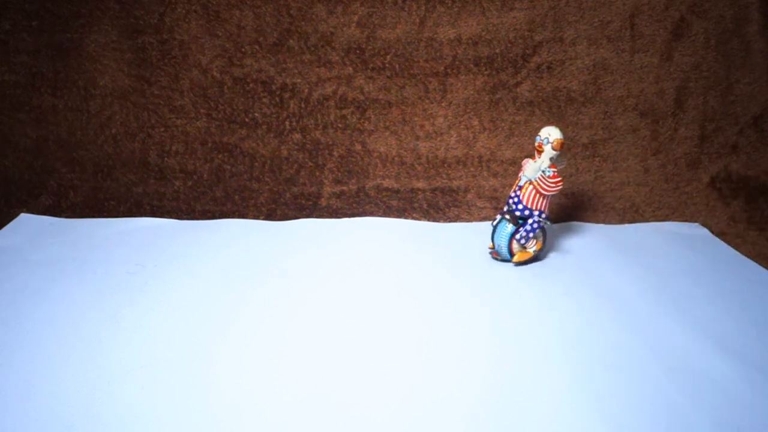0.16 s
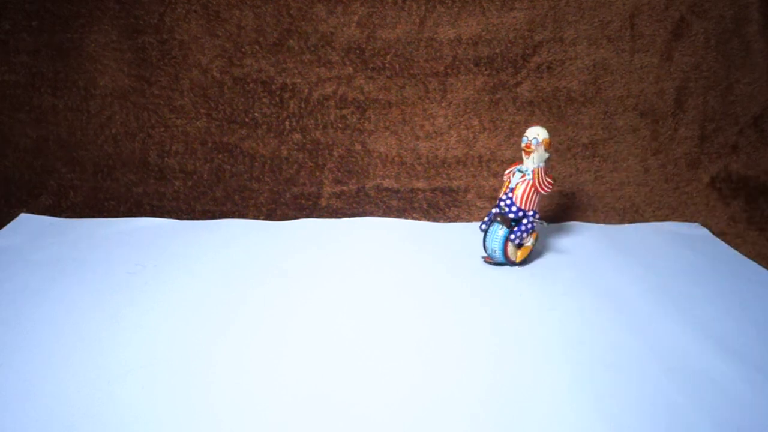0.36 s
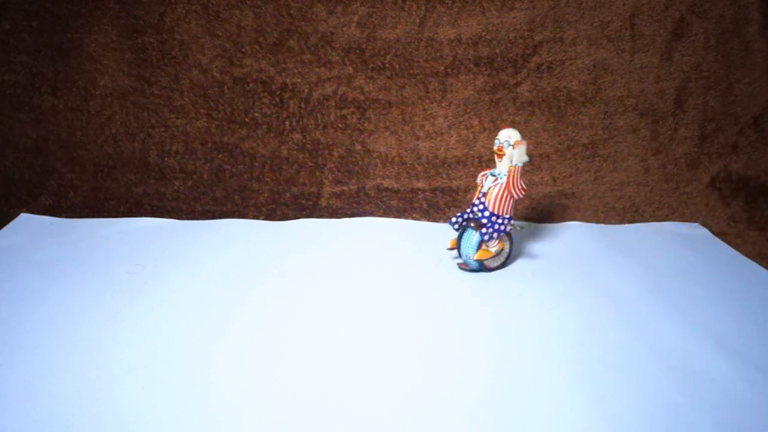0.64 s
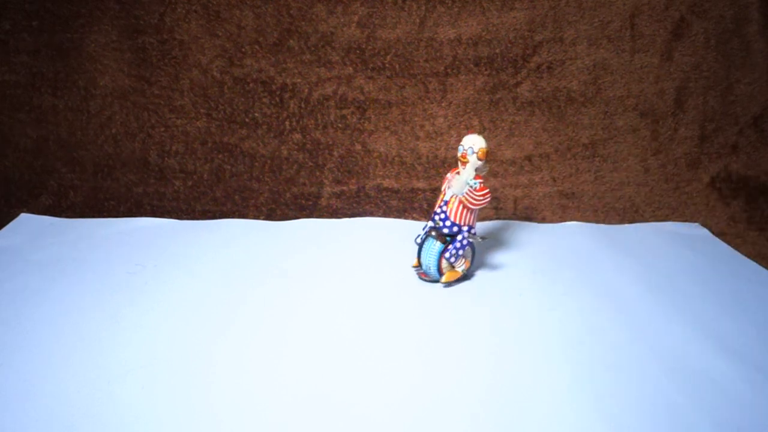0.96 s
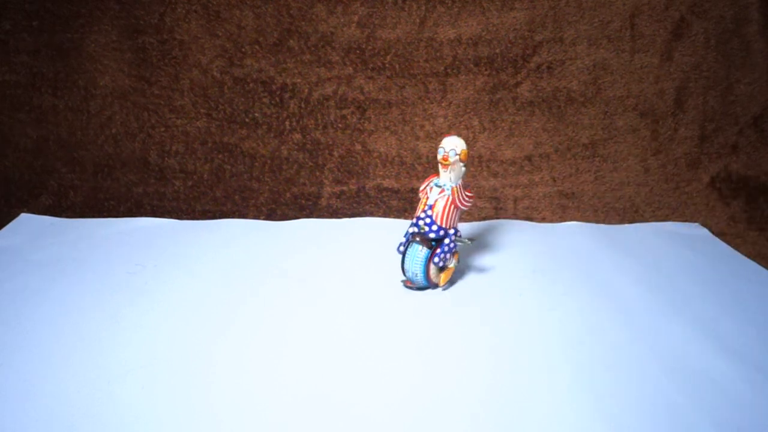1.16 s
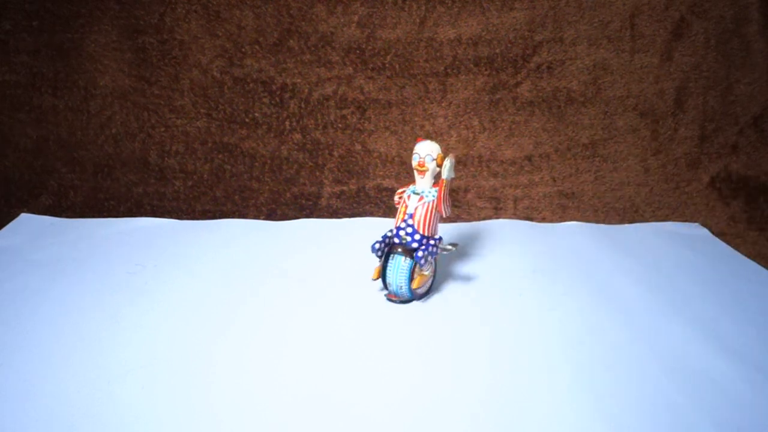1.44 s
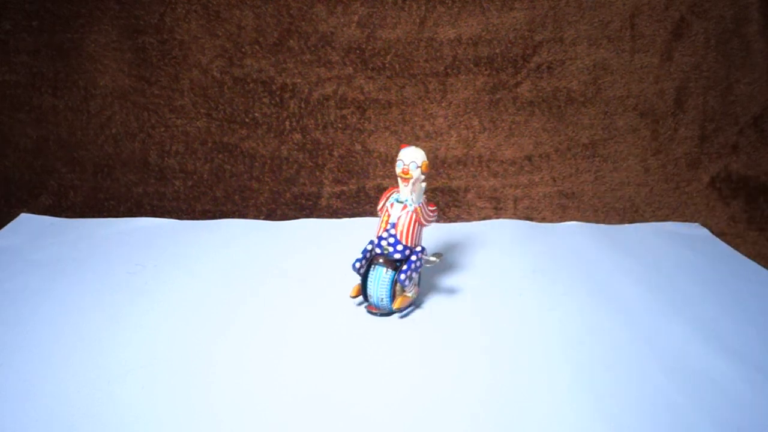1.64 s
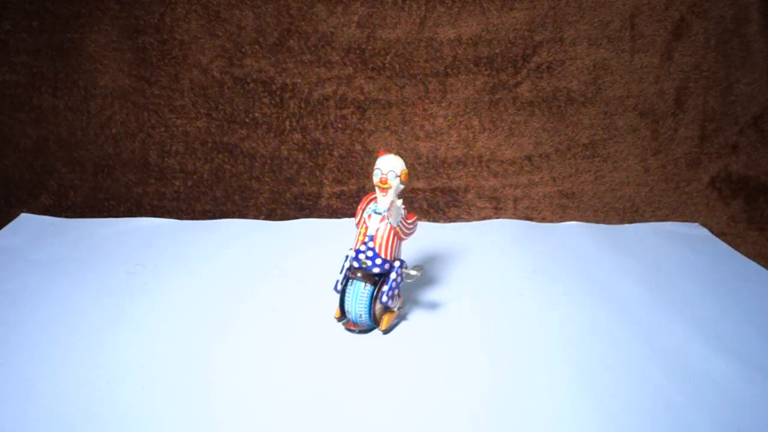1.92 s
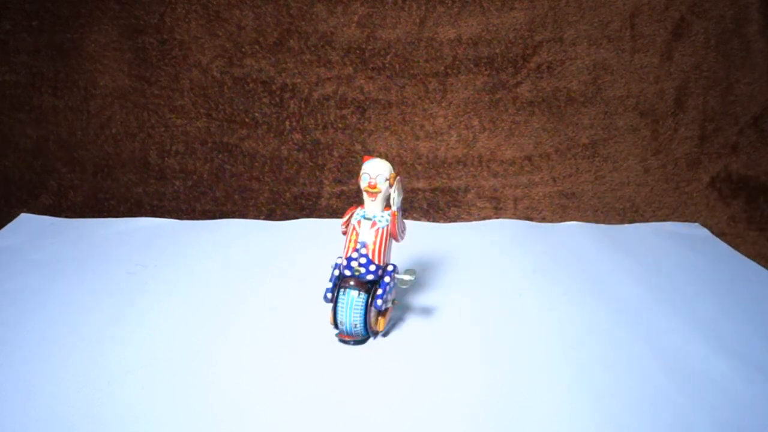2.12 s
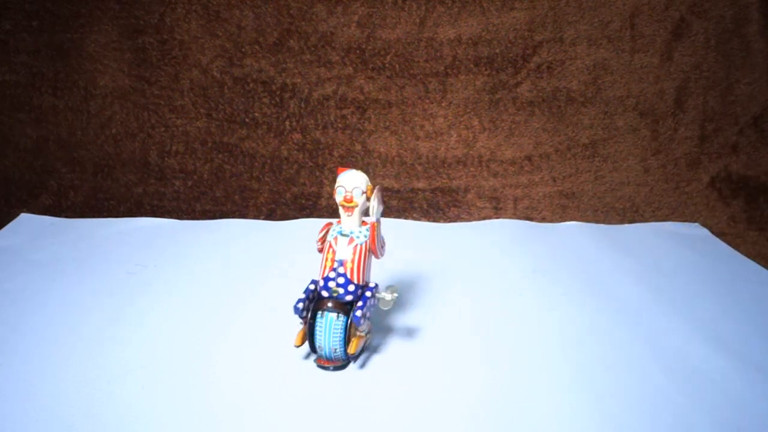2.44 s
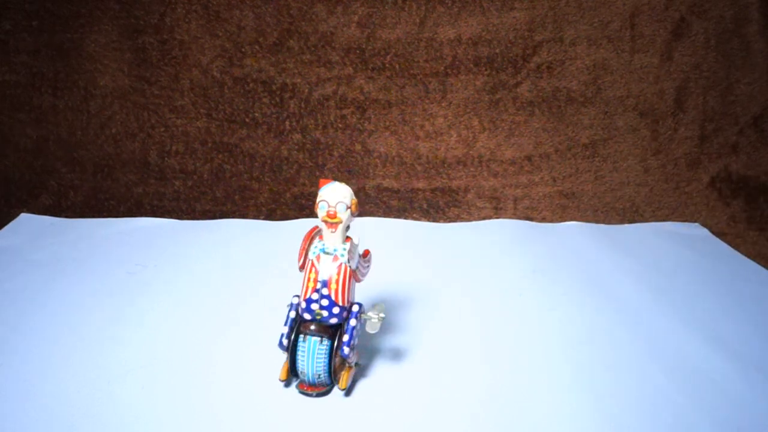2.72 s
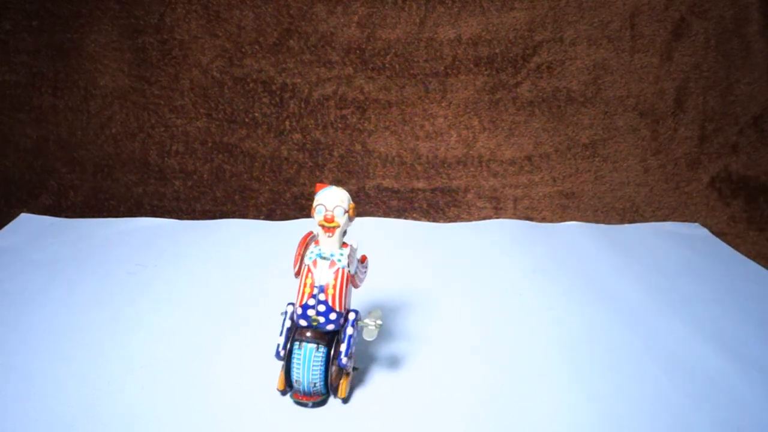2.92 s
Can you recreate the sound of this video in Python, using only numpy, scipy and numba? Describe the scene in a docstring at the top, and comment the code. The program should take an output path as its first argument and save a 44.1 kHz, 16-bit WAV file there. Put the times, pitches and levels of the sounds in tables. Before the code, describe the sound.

A wind-up tin toy starts on the right with laboured ticks. From 0.3 seconds it races into a harsh, ratcheting whir with chattering gears and tiny clinks, its rattle surging near 0.5, 1.3 and 2.3 seconds as it rolls slightly towards the centre. At 2.7 seconds it stalls into single ticks, picking up again around 3 seconds. The small room hums faintly underneath.

```python
"""A wind-up tin toy rolls over a paper-covered table in a small room with a faint hum.
It starts on the right, labouring tick by tick. From 0.3 s the spring races the escapement at up to
100 ticks a second: each tick bounces and rings the tin shell, gears chatter, loose tabs clink.
The arm linkage rattles in midrange surges near 0.5, 1.3 and 2.3 s as the toy drifts a little
towards the centre. At 2.7 s the works stall into single ticks, then pick up again at the very end."""
import sys
import numpy as np
from scipy import signal
from scipy.fft import rfft, irfft, next_fast_len
from scipy.io import wavfile
from scipy.ndimage import uniform_filter1d
from numba import njit

SR = 44100
rng = np.random.default_rng(int(sys.argv[2]) if len(sys.argv) > 2 else 0)


def master_out(mix):
    """Clip the mix to full scale and print it as 16-bit PCM to the path in sys.argv[1]."""
    frames = np.transpose(np.atleast_2d(mix))
    ceiling = np.clip(frames, -1, 1)
    pcm = np.round(ceiling * 32767).astype(np.int16)
    wavfile.write(sys.argv[1], SR, pcm)


N = 135828

# Tone of the still room. Each row: frequency in Hz, EQ gain in dB.
ROOM_TONE_EQ = [(15, -36), (30, -8), (60, -1.5), (110, 2), (200, 2.5), (300, -2.5), (600, -7.5),
                (2000, -12), (16000, -21.5)]
# Midrange peaks of the clatter, coloured by reflection off the table. Each row: centre in Hz, width
# in Hz, gain in dB, shift at full glide in Hz, top of its swell in seconds, half-length in seconds.
MID_PEAKS = [(871, 75, -6, -47, 2.23, 0.35), (837, 105, -9.5, -54, 1.27, 0.21),
             (702, 170, -10.5, 0, 0.57, 0.23), (1426, 86, -2, -190, 0.99, 0.94),
             (1406, 81, -2.5, -190, 2.29, 0.39), (1977, 82, 1, -290, 0.75, 0.32),
             (1993, 64, 7.5, -300, 1.136, 0.27), (1997, 77, 8, -300, 1.59, 0.16),
             (1970, 110, 3, -300, 2.075, 0.19), (2164, 240, -2, -100, 2.8, 0.42)]
# The peaks rise for a second, then glide down as the toy moves.
# Each row: time in seconds, share of the full downward glide.
PEAK_GLIDE = [(0, 0.62), (.4, 0.49), (1.0, 0.011), (1.24, 0.39), (1.55, 0.82), (2.05, 0.83), (3.08, 0.95)]
# Rings of the tin panels. Each row: pitch in Hz, gain in dB, 60 dB decay time in seconds,
# time the panel faces the listener in seconds, half-length of that swell in seconds.
PANEL_MODES = [(2650, -1, .02, .25, .2), (2850, -1, .012, .35, .3), (3190, -7, .02, .6, .4),
               (3500, 3, .008, .62, .05), (3350, 6.5, .007, 1.46, .055), (3950, -3, .012, .55, .25),
               (3780, 0, .018, .97, .18), (4320, -7, .015, .08, .12), (2570, -3, .025, 1.7, .1),
               (2960, -3, .02, 1.7, .3), (2830, -2, .018, 2.65, .5), (4230, -4, .025, 2.8, .3),
               (5430, -2, .018, .25, .25), (5290, 5.5, .035, 2.11, .055), (5650, -4, .018, 2.7, .7),
               (7300, -2, .012, 2.3, .2), (8250, -2, .022, .7, .4), (9830, -4, .015, 1.35, .3),
               (10580, 0, .008, 2.28, .16), (13700, 1, .007, .7, .6), (14870, -2, .02, 1.5, .2)]
# Colour of a tick on the tin. Each row: frequency in Hz, EQ gain in dB.
TIN_EQ = [(30, -90), (200, -34), (500, -24.5), (700, -20), (1050, -23), (1500, -13), (2000, -5),
          (2300, -7.5), (2750, -7.5), (4000, -2), (4800, -3.5), (5600, -0.25), (7000, -0.5), (7700, -1.5),
          (10000, 2), (12500, 1.1), (14200, 1), (16000, 1.15)]
# Place of the toy. Each row: time in seconds, left minus right in dB.
TOY_PAN = [(0, -11.5), (.6, -9.5), (1.7, -8), (3.08, -7)]
# Speed of the clockwork. Each row: time in seconds, escapement teeth per second.
TOOTH_RATE = [(0.0, 47.6), (0.14, 34.8), (0.17, 69.3), (0.23, 29.2), (0.29, 100.4), (0.49, 102.5),
              (0.51, 93.9), (0.64, 98.3), (0.76, 76.6), (0.78, 83.1), (0.94, 65.9), (0.97, 50.2),
              (1.04, 77.8), (1.07, 59.5), (1.12, 102.5), (1.25, 97.6), (1.28, 101.0), (1.35, 85.4),
              (1.45, 101.2), (1.51, 94.5), (1.55, 61.4), (1.66, 75.0), (1.81, 65.3), (1.83, 51.8),
              (1.93, 73.9), (1.97, 41.4), (2.03, 82.8), (2.13, 99.4), (2.25, 81.3), (2.28, 96.2),
              (2.31, 76.4), (2.37, 96.1), (2.45, 90.6), (2.5, 61.3), (2.56, 73.4), (2.77, 54.1),
              (2.83, 32.4), (2.91, 78.1), (2.96, 42.8), (3.08, 95.6)]
# Force of the running works. Each row: time in seconds, relative level in dB.
WORKS_FORCE = [(0, 10.5), (.05, -11), (.115, -14), (.17, -5), (.245, -14), (.28, -4), (.45, -2.5),
               (.55, -4.5), (.69, -3), (.72, -7), (.77, -2), (1.06, -4.5), (1.13, -2), (1.28, -1.5),
               (1.36, -3.5), (1.5, -1.5), (1.55, -3), (1.67, -1.5), (1.78, -3), (1.81, -8), (1.85, -10),
               (1.87, -1), (1.92, -3.5), (1.94, -7), (1.97, -6.5), (2.06, -0.5), (2.4, -2), (2.55, -3),
               (2.73, -2.5), (2.765, -18), (2.82, -10), (2.91, 6), (2.98, -8), (3.08, 8)]
# Surges in which the arm linkage rattles. Each row: start and end in seconds.
ARM_SURGES = [(.285, .705), (1.1, 1.54), (2.03, 2.485), (3.035, 3.2)]
# Stretches where the works labour one tooth at a time. Each row: start and end in seconds.
STALLS = [(0, .276), (2.74, 3.09)]
# Single ticks in those stalls. Each row: start in seconds, relative level in dB.
STALL_TICKS = [(.001, -10), (.0085, -5.5), (0.031, -9.5), (0.073, -10), (.0992, -9.5), (0.127, -6),
               (0.1511, -8), (0.1693, -6), (0.1837, -7.5), (0.2027, -8), (0.23, -8.5), (0.2555, -7.5),
               (0.2663, -2.5), (2.748, -8), (2.802, -12), (2.8314, -8), (2.855, -4), (2.8767, -4),
               (2.8888, 0), (2.9025, -2.5), (2.9201, -2.5), (2.937, -22), (2.9498, -14), (2.9735, -14),
               (2.994, -4), (3.006, 1.5), (3.0234, -0.5), (3.038, -0.5), (3.05, 1.5), (3.058, 0.5),
               (3.065, -2.5), (3.072, 2)]

FULL_SPEED_HZ = 95
SHELL_DB, PANEL_DB, CLINK_DB, MID_DB = -26.5, -37, -43, -44  # rms before panning
AIR_DB, HUM_DB = -59.5, -61.5  # rms


def amp(db):
    """Decibels to gain."""
    return 10 ** (np.asarray(db) / 20)


def curve(table, t):
    """Automation: straight lines through the rows of a table."""
    return np.interp(t, *np.array(table, float).T)


def level(x, db):
    """Set the rms level."""
    return x * amp(db) / np.sqrt(np.mean(x ** 2))


def unit(x):
    """Unit energy along the last axis."""
    return x / np.sqrt(np.sum(x ** 2, axis=-1, keepdims=True))


def fade(t, t60):
    """Exponential decay, 60 dB down at t60."""
    return np.exp(-np.log(1000) * t / t60)


def equalise(x, points):
    """Minimum-phase EQ through (Hz, dB) points."""
    hz, db = np.array(points, float).T
    size = next_fast_len(N + 8192)
    gain = amp(np.interp(np.log(np.fft.rfftfreq(2 * size, 1 / SR) + 1), np.log(hz), db))
    cepstrum = irfft(np.log(gain))
    cepstrum[1:size] *= 2
    cepstrum[size + 1:] = 0
    return irfft(rfft(x, 2 * size) * np.exp(rfft(cepstrum)))[..., :N]


def convolve(x, response):
    """Play mono x through a stereo response."""
    return signal.oaconvolve(x[None], response, axes=-1)[:, :N]


@njit
def bandpass(x, hz, width):
    """State-variable band-pass with a moving centre."""
    y, band, low = np.empty(len(x)), 0., 0.
    for i in range(len(x)):
        g, damping = np.tan(np.pi * hz[i] / SR), width / hz[i]
        v = (band + g * (x[i] - low)) / (1 + g * (g + damping))
        band, low, y[i] = 2 * v - band, low + 2 * g * v, damping * v
    return y


def pace(t):
    """Speed in doublings from full speed; every speed_db is dB per doubling."""
    return np.log2(curve(TOOTH_RATE, t) / FULL_SPEED_HZ)


def swell(t, top, span, floor=.14):
    """A bell-shaped rise and fall above a faint floor."""
    return floor + np.exp(-np.square((t - top) / span))


def room_tone(t, hum_hz=98.5, waver=.6, waver_hz=16):
    """Soft air and a low hum that wavers in level and phase."""
    mid, side = equalise(rng.standard_normal((2, N)), ROOM_TONE_EQ)
    air = level(mid + 0.26 * side * np.array([[1], [-1]]), AIR_DB)
    span = int(SR / waver_hz)
    drift = uniform_filter1d(rng.standard_normal((2, N)), span, mode="wrap")
    wobble, slip = waver * level(uniform_filter1d(drift, span // 2, mode="wrap"), 0)
    phase = 2 * np.pi * hum_hz * t
    return air + level((1 + wobble) * np.sin(phase) + slip * np.cos(phase), HUM_DB)


def room_reverb(x, t60=.3, wet_db=-7.5, predelay_s=.0056):
    """Short diffuse tail of a small furnished room."""
    age = np.arange(SR // 2) / SR
    tail = rng.standard_normal((2, len(age))) * fade(age, t60) * (age > predelay_s)
    return amp(wet_db) * convolve(x, unit(tail))


def arm_surge(t, edge_s=.025):
    """Ramps to 1 while the arm linkage rattles, 0 elsewhere."""
    return sum(np.clip(np.minimum(t - start, end - t) / edge_s + .5, 0, 1) for start, end in ARM_SURGES)


def mid_clatter(knocks, t, speed_db=4.5, surge_db=2.5, pan_db=-6.5):
    """Gliding peaks, the colour of the table's reflection, rasp on the right with speed and surges."""
    drive, out = knocks * amp(speed_db * pace(t) + surge_db * arm_surge(t)), 0
    for hz, width, db, shift, top, span in MID_PEAKS:
        centre = hz + shift * curve(PEAK_GLIDE, t)
        tone = bandpass(drive * swell(t, top, span), centre, float(width))
        out = out + amp(db) * bandpass(tone, centre, hz / 2)
    return level(out, MID_DB) * amp(np.array([[pan_db], [-pan_db]]) / 2)


def loose_tabs(times, blow_db, share=.6, low_hz=2700, high_hz=8000, t60=.028, scatter_db=1.5):
    """Some blows shake a loose tab, which clinks briefly with two pitches of its own."""
    size = 3000
    age, out = np.arange(size) / SR, np.zeros((2, N + size))
    for start, db in zip(times, blow_db):
        hz = low_hz * (high_hz / low_hz) ** rng.random((2, 1))
        tone = np.sin(2 * np.pi * hz * age + np.pi * rng.random((2, 2, 1))).sum(axis=1)
        gain = amp(db + scatter_db * rng.standard_normal()) * (rng.random() < share)
        i = int(np.clip(start * SR, 0, N))
        out[:, i:i + size] += gain * tone * fade(age, t60 * (.5 + rng.random()))
    return level(out[:, :N], CLINK_DB)


def tin_panels(knocks, t, seats=3, detune=.0036, hold_s=.011):
    """Metallic rings swell as the panels turn past; the loose tin shifts pitch from blow to blow."""
    age, out = t[:SR // 10], 0
    push = knocks * amp(-.08 * curve(WORKS_FORCE, t))  # soft ticks favour the rings
    for hz, db, t60, facing, span in PANEL_MODES:
        seat = rng.integers(seats, size=N)[(t / hold_s).astype(int)]
        drive = amp(db) * push * swell(t, facing, span)
        phase = np.pi * rng.random((2, 1))
        for k in range(seats):
            tone = np.sin(2 * np.pi * hz * (1 + detune * (k - 1)) * age + phase)
            out = out + convolve(drive * (seat == k), unit(fade(age, t60) * tone))
    low_cut = signal.butter(3, 1500, "high", fs=SR, output="sos")  # the panel rings are kept above 1.5 kHz
    return level(signal.sosfilt(low_cut, out), PANEL_DB)


def tin_spot(crack_t60=.014, ring_t60=.053, ring_db=-5, widen_hz=2970, size=6000):
    """One spot of tin answers with a crack and a dense short ring, centred low and wide up top."""
    age, hz = np.arange(size) / SR, np.fft.rfftfreq(size, 1 / SR)
    coherence = .16 + .82 / (1 + (hz / widen_hz) ** 4)
    mid, side = rfft(rng.standard_normal((2, size)))
    noise = irfft(mid * np.sqrt(1 + coherence) + side * np.sqrt(1 - coherence) * np.array([[1], [-1]]))
    envelope = np.hypot(unit(fade(age, crack_t60)), amp(ring_db) * unit(fade(age, ring_t60)))
    return unit(noise * envelope)


def tin_shell(knocks, t, spots=28, spread=1.3, dull_hz=6600, speed_db=3):
    """Knocks land on neighbouring spots of tin, which change as the toy rolls; slow ticks are duller."""
    spot = np.round(spots * t / t[-1] + spread * rng.standard_normal(N)) % spots
    clatter = equalise(sum(convolve(knocks * (spot == k), tin_spot()) for k in range(spots)), TIN_EQ)
    low = signal.sosfiltfilt(signal.butter(2, dull_hz, fs=SR, output="sos"), clatter)
    treble = (clatter - low) * amp(speed_db * pace(t))
    return level(low + treble, SHELL_DB)


def gear_chatter(t, hits_per_s=1000, trim_db=-21.5, speed_db=.5, scatter_db=.5):
    """Loose teeth knock at random, harder with force and speed."""
    hits = rng.random(N) < hits_per_s / SR
    db = trim_db + curve(WORKS_FORCE, t) / 2 + speed_db * pace(t) + scatter_db * rng.standard_normal(N)
    return hits * amp(db) * rng.choice([-1, 1], N)


def bounces(times, blow_db, count=6, gap_s=.0008, touch_db=-2, loss_db=.8, scatter_db=.84):
    """Each blow is a light first touch, then a string of fading bounces, one click each."""
    gaps = gap_s * (.5 + rng.random((len(times), count)))
    contacts = times[:, None] + np.cumsum(gaps, axis=1) - gaps[:, :1]
    contour_db = np.r_[touch_db, -loss_db * np.arange(count - 1)]
    shares = unit(amp(contour_db + scatter_db * rng.standard_normal(gaps.shape)))
    sizes = shares * amp(blow_db)[:, None] * rng.choice([-1, 1], gaps.shape)
    inside = (contacts >= 0) & (contacts < (N - 1) / SR)
    return np.bincount((contacts[inside] * SR).astype(int), sizes[inside], N)


def escapement(t, lead_s=.0005, jitter_s=.0003, scatter_db=1.5):
    """Times and levels of the blows: two pallets strike in turn; a stall leaves only single ticks."""
    cycles = .7 + np.cumsum(curve(TOOTH_RATE, t)) / SR  # starts partway through a tooth
    teeth, blows = np.arange(1, int(cycles[-1]) + 1), [np.array(STALL_TICKS)]
    # The second pallet lands about half a tooth later, softer, and falls away at low speed.
    for offset, pallet_db, speed_db in ((0, 0, 0), (.52, -5.5, 6.5)):
        times = np.interp(teeth + offset, cycles, t)
        slip, strength = rng.standard_normal((len(times), 2)).T
        stalled = np.any([(times > start) & (times < end) for start, end in STALLS], axis=0)
        db = curve(WORKS_FORCE, times) + pallet_db + speed_db * pace(times) + scatter_db * strength
        blows.append(np.c_[times - lead_s + jitter_s * slip, db][~stalled])
    return np.vstack(blows).T


def scene():
    """The clockwork knocks on the tin, whose clatter drifts in from the right."""
    t = np.arange(N) / SR
    times, blow_db = escapement(t)
    knocks = bounces(times, blow_db) + gear_chatter(t)
    tin = tin_shell(knocks, t) + tin_panels(knocks, t) + loose_tabs(times, blow_db)
    pan_db = curve(TOY_PAN, t)
    toy = tin * amp(np.array([pan_db, -pan_db]) / 2) + mid_clatter(knocks, t)
    return toy + room_reverb(toy.mean(axis=0)) + room_tone(t)


def record(dry):
    """A steep high cut at 15.8 kHz on the whole mix."""
    return signal.sosfilt(signal.ellip(12, .2, 80, 15800, fs=SR, output="sos"), dry)


dry = scene()
out = record(dry)
master_out(out)
```